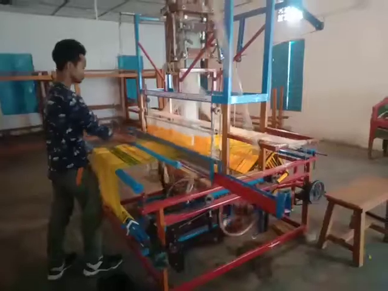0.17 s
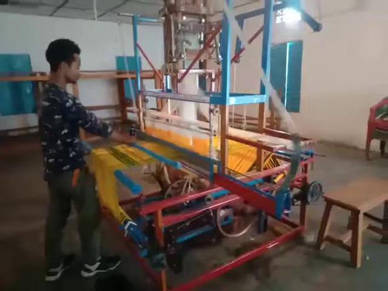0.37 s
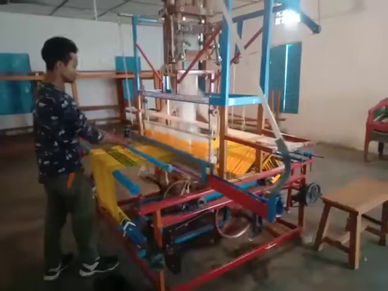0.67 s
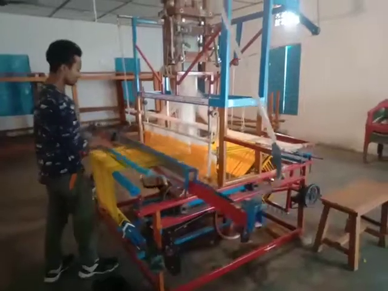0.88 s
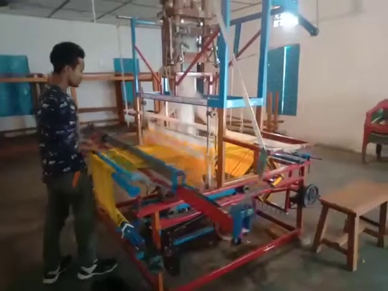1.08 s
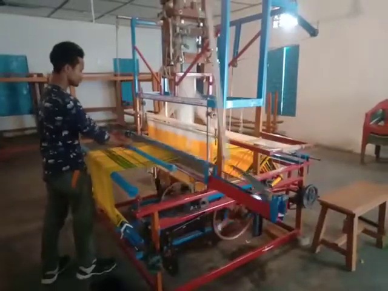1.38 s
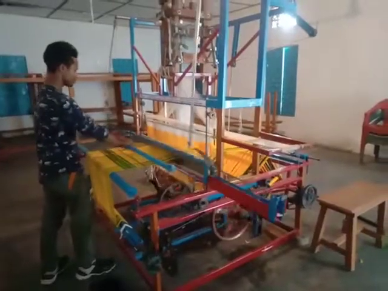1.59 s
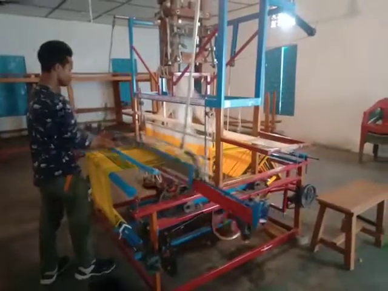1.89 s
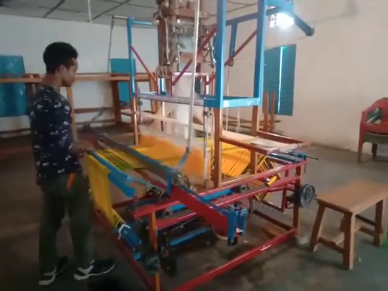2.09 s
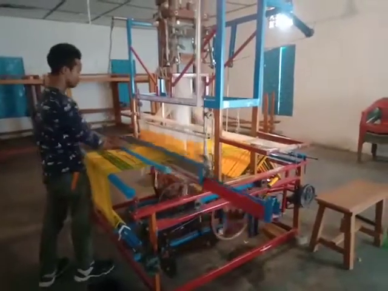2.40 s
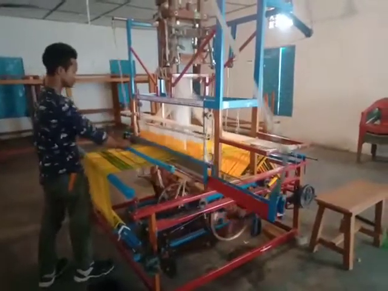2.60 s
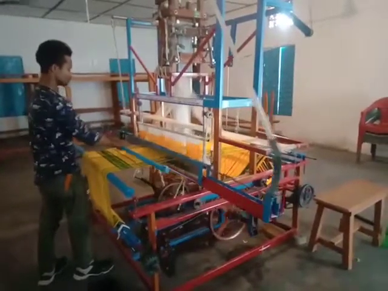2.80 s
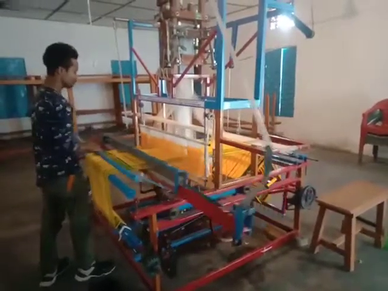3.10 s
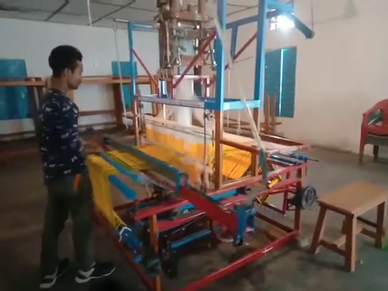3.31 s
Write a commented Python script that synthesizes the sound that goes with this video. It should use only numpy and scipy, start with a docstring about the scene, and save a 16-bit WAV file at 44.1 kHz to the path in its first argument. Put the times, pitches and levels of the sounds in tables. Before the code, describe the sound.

Continuous loom clatter with a fast motor flutter, gear roar and whine, fizzing treble bursts, dull frame knocks and faint rod clinks, in a hard, modestly echoing room, captured by a phone with little deep bass.

```python
"""A power loom runs in a bare workshop, heard by a phone whose input opens and fades in.
Roar, frame clatter, hook rattle and heddle fizz are ticks over noise, coloured per part and swelling
with the shed changes; floor rumble lies below. Gears and rubbed rods whine as noisy lines.
Harness crashes are decaying rattle bursts; batten and picker knocks and rod clinks are struck modes
with a hall tail."""
import sys
import numpy as np
from scipy import signal
from scipy.fft import rfft, irfft, next_fast_len
from scipy.io import wavfile
from scipy.ndimage import uniform_filter1d, map_coordinates

SR = 44100
rng = np.random.default_rng(int(sys.argv[2]) if len(sys.argv) > 2 else 0)


def ratio(d):
    """dB to gain"""
    e = np.asarray(d, float) / 20
    return 10 ** e


def int16_out(signal):
    """Quantize to a 16-bit WAV file."""
    q = np.round(np.clip(np.atleast_2d(signal).T, -1, 1) * 32767)
    wavfile.write(sys.argv[1], SR, q.astype(np.int16))


N = 152145

# Reverberation. Each row: frequency in Hz, t60 in seconds.
HALL_T60_S = [(200, 0.46), (2000, 0.65), (10000, 0.46)]
# Floor rumble. Each row: time in seconds, level in dB.
RUMBLE_LEVEL_DB = [(0.24, -57), (0.75, -40), (0.78, -48), (1.1, -40), (1.29, -46), (1.67, -55), (1.79, -43),
                   (1.84, -63), (1.95, -40), (2.11, -54), (2.38, -43), (2.84, -51.5), (2.89, -42),
                   (3.06, -53), (3.36, -42), (3.43, -47)]
# Spectrum of the floor rumble. Each row: frequency in Hz, density in dB per Hz.
RUMBLE_SPECTRUM_DB = [(18, -55), (30, -25), (92, -13), (119, -2), (205, -3), (241, -0.5), (380, -5),
                      (490, -14), (840, -120)]
# Steel rod modes. Each row: frequency in Hz, relative level in dB, t60 in seconds.
SHORT_ROD_MODES = [(5970, 7, .3), (6350, -4, .3), (6780, -4, .25), (8409, -11, .3), (8834, -15, .2),
                   (9485, 3, .13), (10100, -2, .25), (10420, -11, .25), (11000, -4, .14), (11990, -6, .13),
                   (12440, -6, .13), (13800, -6, .05), (14200, -16, .3)]
LONG_ROD_MODES = [(4856, 2, .35), (6121, 4, .4), (9600, -10, .15), (10550, -11, .25), (11100, -2, .1),
                  (12260, -6, .16), (13700, -8, .05)]
THIN_ROD_MODES = [(4760, 6, 0.17), (10900, 6, 0.081), (12000, -3, .25), (13400, -12, .08), (14600, -9, .08)]
# Contacts on each rod. Each row: time in seconds, relative level in dB.
SHORT_ROD_HITS = [(1.2055, -25), (1.227, -35), (1.245, -34)]
LONG_ROD_HITS = [(1.0179, -30), (2.07, -37), (2.283, -38), (3.363, -29), (3.39, -35)]
THIN_ROD_HITS = [(.7609, -38), (.81, -29.5), (2.535, -31), (2.59, -31), (3.0627, -32)]
# Frame modes under a blow. Each row: frequency in Hz, relative level in dB, t60 in seconds.
FRAME_MODES = [(1850, -8, 0.01), (2026, 3.5, 0.03), (2250, -14, 0.057), (2326, 18, 0.021),
               (2440, -2, 0.035), (2850, -5, 0.016)]
# Batten and picker knocks on the frame. Each row: time in seconds, relative level in dB.
FRAME_KNOCKS = [(0.719, -12), (0.8749, -1), (0.964, -7), (1.1438, -10), (1.1677, -4.5), (1.288, -8),
                (1.4301, -2), (1.4728, -1), (1.503, 2), (1.5423, -1), (1.5624, 2.5), (2.0722, -1.5),
                (2.114, -1.5), (2.167, 0.5), (2.3096, -4), (2.5165, -4), (2.5935, 1), (2.7343, -12),
                (3.4141, -3.5)]
# The picker's blow and its rebound. Each row: time in seconds, relative level in dB.
PICKER_BLOWS = [(1.3128, 0), (1.3212, -10)]
# Gear whines and rubbed rods. Each row: start in seconds, end in seconds, pitch in Hz, width in Hz,
# level in dB.
WHINE_SPANS = [(.1, 2.6, 130, 6.2, -60.5), (.9, 1.35, 123, 3.5, -46), (1.5, 1.9, 123, 9, -55),
               (3.24, 3.5, 125, 10, -48), (1.14, 1.25, 1760, 40, -27), (1.49, 1.6, 1490, 60, -29),
               (3.365, 3.5, 6121, 30, -31), (.29, .75, 1377, 16, -33), (.97, 1.13, 1370, 14, -35),
               (2.54, 3.0, 1377, 22, -35), (.8, 1.16, 952, 16, -39), (1.75, 2.15, 952, 26, -41),
               (2.3, 2.65, 952, 25, -41), (2.9, 3.04, 662, 30, -40), (0.322, 0.79, 2286, 30, -29),
               (1.3, 1.63, 2286, 27, -21.5), (2.07, 2.45, 2000, 56, -21.5), (1.3, 1.56, 3000, 96, -26.5),
               (.77, 1.02, 4800, 300, -29), (1.02, 1.22, 4791, 32, -30), (1.45, 1.64, 4900, 450, -26),
               (2.507, 2.78, 4950, 700, -25), (3.016, 3.33, 4850, 350, -26), (1.09, 1.18, 10520, 50, -42),
               (1.31, 1.414, 6120, 61, -26)]
# Harness crashes. Each row: start in seconds, relative level in dB, t60 in seconds,
# hooks against heddles in dB.
HARNESS_CRASHES = [(.202, -28.5, 0.31, 5), (.556, -33.5, 0.17, 14), (.761, -38, 0.18, -7),
                   (.835, -24.5, 0.1, 10.5), (1.018, -26, 0.064, -3), (1.172, -25, 0.047, 0),
                   (1.206, -24, 0.084, -1), (1.313, -21, 0.061, 3), (1.415, -32, 0.3, 6),
                   (1.544, -12, 0.066, 0), (2.07, -24, .1, -8), (2.242, -31, 0.077, 9),
                   (2.44, -26, 0.16, 7), (2.506, -19, 0.2, -4), (2.59, -20.5, 0.16, 0),
                   (2.632, -24.5, 0.15, 10), (1.995, -27.5, 0.15, 1), (1.835, -27, 0.075, 12),
                   (.335, -31, 0.31, 0), (2.906, -27.5, 0.14, -3), (3.016, -31, 0.09, 17),
                   (3.062, -19, 0.046, 5), (3.31, -35, .08, -7), (3.363, -24.5, .08, 9)]
# Part levels. Each row: time in seconds, drive roar in dB, then frame clatter, hook rattle and
# heddle fizz in dB before trim.
PART_LEVELS_DB = [(0.24, -35, -22, -22.5, -30.5), (0.35, -31.5, -16, -18, -29.5),
                  (0.43, -32, -17.5, -20, -36.5), (0.75, -27.5, -17.5, -22, -41),
                  (0.76, -34, -18, -19.5, -31), (0.95, -29, -20.5, -20.5, -36.5),
                  (1.19, -27.5, -19, -24, -40.5), (1.22, -32, -18, -21, -35), (1.27, -24, -18, -19.5, -41),
                  (1.31, -42, -15.5, -31.5, -37), (1.32, -30, -15.5, -24, -35.5),
                  (1.39, -32.5, -19, -25, -36), (1.42, -33.5, -15, -18.5, -27.5),
                  (1.53, -26, -11.5, -16.5, -31), (1.55, -28, -12.5, -15.5, -21.5),
                  (1.63, -31.5, -15.5, -19.5, -32), (2.04, -29.5, -17.5, -18.5, -38.5),
                  (2.1, -31.5, -15.5, -24, -33), (2.15, -30.5, -19.5, -25, -38.5),
                  (2.35, -27.5, -14.5, -25.5, -38.5), (2.5, -31, -17, -19.5, -32),
                  (2.515, -28.5, -14, -13, -24.5), (2.82, -32, -18.5, -20, -37.5),
                  (2.9, -28.5, -16, -18.5, -36), (3.01, -29.5, -18, -23.5, -37),
                  (3.02, -34.5, -19, -19, -26.5), (3.26, -28, -19, -19.5, -34.5),
                  (3.43, -31, -17, -24, -38.5)]
# Spectra of the parts. Each row: frequency in Hz, relative level in dB.
ROAR_SPECTRUM_DB = [(190, -50), (330, -14.5), (521, -11.5), (671, -7.5), (757, -9.5), (939, -4), (1230, -3),
                    (1500, -1.5), (1950, -53), (3300, -120)]
FRAME_SPECTRUM_DB = [(760, -37), (1300, -26.5), (1370, -34), (1570, -11), (2240, 1.5), (2330, -1),
                     (2690, -7.5), (3300, -13), (4300, -24), (5590, -80), (9460, -120)]
HOOK_SPECTRUM_DB = [(2240, -31), (3800, -5), (4310, -6), (4680, 0), (4890, 0), (6150, -4.5), (7100, -10.5),
                    (7900, -22), (8600, -21.5), (11200, -24.5), (18900, -120)]
HEDDLE_SPECTRUM_DB = [(4590, -10.5), (7800, -0.5), (9040, -10.5), (9740, 1.5), (10800, 3), (11400, -1),
                      (12300, 1), (12600, -3), (14800, -7.5), (15600, -19)]
# Phone input fade. Each row: time in seconds, gain in dB.
INPUT_GAIN_DB = [(.1145, -24), (.128, -16), (.15, -10.5), (.198, -9), (.216, 0), (.26, 0)]

HALL_DB = -3
SHAFT_HZ = 20.6  # mean motor shaft turns a second
WHINE_RISE_S, WHINE_FALL_S = .008, .06
INPUT_OPENS_S, LOW_CUT_HZ = .1145, 86
CLIP_CEILING, CLIP_KNEE = 1.03, 5  # amplitude; exponent, higher = harder


def unit(x):
    """Scaled to rms 1."""
    return x / np.sqrt(np.mean(x ** 2) + 1e-20)


def along(points, hz):
    """(Hz, value) points interpolated on a log frequency axis."""
    f, v = np.transpose(points)
    return np.interp(np.log(hz + 1), np.log(f + 1), v)


def curves(rows):
    """One value per sample for each column after the time."""
    s, *cols = np.transpose(rows)
    return [np.interp(np.arange(N) / SR, s, c) for c in cols]


def wobble(knots_per_s):
    """A smooth random curve through normal knots."""
    knots = rng.standard_normal(N // 200)
    return map_coordinates(knots, [np.arange(N) * knots_per_s / SR])


def filtered(x, response):
    """x times a zero-phase response of frequency in Hz."""
    m = next_fast_len(N + SR // 2)
    return irfft(rfft(x, m) * response(np.fft.rfftfreq(m, 1 / SR)), m)[..., :N]


def clatter(spectrum, ticks_per_s, spread_db, ticks_db, patchy_db, ring_db):
    """Random ticks over a noise wash, with patches and narrow ringing peaks, coloured by the part; rms 1."""
    chance, sign, size = rng.random((3, N))
    ticks = (chance < ticks_per_s / SR) * np.sign(sign - .5)
    ticks = ticks * ratio(-spread_db * np.log(size + .002))
    wash = rng.standard_normal(N)
    z = signal.stft(ratio(ticks_db) * unit(ticks) + wash, nperseg=1024)[2]
    patches = uniform_filter1d(rng.standard_normal(z.shape), size=10, axis=0)
    patches = uniform_filter1d(patches, size=5, axis=1)
    # smoothed in time only: one bin wide
    rings = uniform_filter1d(rng.standard_normal(z.shape), size=14, axis=1)
    z = z * ratio(patchy_db * unit(patches) + ring_db * unit(rings))
    x = signal.istft(z, nperseg=1024)[1][:N]
    return unit(filtered(x, lambda hz: ratio(along(spectrum, hz))))


def struck(times_s, levels_db, modes, attack_s, scatter_db, flutter_hz, rough):
    """Each blow rings the modes anew; loose contact soon makes each mode flutter."""
    hz, db, t60_s = np.transpose(modes)[:, :, None]
    out = np.zeros(N + SR)
    t = np.arange(round(min(t60_s.max(), .5) * SR)) / SR
    onset = 1 - np.exp(-t / attack_s)
    flutter_onset = 1 - np.exp(-t * flutter_hz)

    def flutter(knots):
        rows = [map_coordinates(k, [t * flutter_hz], order=1) for k in knots]
        return np.array(rows) * flutter_onset

    for s, level_db in zip(times_s, levels_db):
        level_draw, pitch_draw = rng.standard_normal((2, len(modes), 1))
        in_phase, quadrature = [flutter(k) for k in rng.standard_normal((2, len(modes), 200))]
        phase = 2 * np.pi * hz * (1 + 0.0021 * pitch_draw) * t
        decay = ratio(db + scatter_db * level_draw - 60 * t / t60_s)
        ring = decay * ((1 + rough * in_phase) * np.sin(phase) + rough * quadrature * np.cos(phase))
        out[round(s * SR):][:len(t)] += ratio(level_db) * ring.sum(0) * onset
    return out[:N]


def hall(x):
    """A delayed noise tail of unit energy in which each frequency dies at its own speed."""
    hz, t, z = signal.stft(rng.standard_normal(SR), SR, nperseg=256)
    decay = ratio(-60 * t / along(HALL_T60_S, hz)[:, None])
    tail = signal.istft(z * decay, SR, nperseg=256)[1]
    delayed = np.pad(x, (300, 0))  # samples
    return signal.fftconvolve(delayed, tail / np.linalg.norm(tail))[:N]


def floor_rumble():
    """Low noise with sparse ticks, its level drifting."""
    level_db = curves(RUMBLE_LEVEL_DB)[0] + 1.4 * wobble(8.6)
    return ratio(level_db) * clatter(RUMBLE_SPECTRUM_DB, 100, 1.6, ticks_db=-4.5, patchy_db=1.5, ring_db=1.2)


def clinks():
    """Contacts ring three steel rods, each with its own modes."""
    rods = [(SHORT_ROD_HITS, SHORT_ROD_MODES), (LONG_ROD_HITS, LONG_ROD_MODES),
            (THIN_ROD_HITS, THIN_ROD_MODES)]
    loose = dict(attack_s=.0008, scatter_db=1.5, flutter_hz=90, rough=.45)
    return sum(struck(*np.transpose(hits), modes, **loose) for hits, modes in rods)


def knocks():
    """Dull batten and picker blows ring the frame's short modes."""
    s, db = np.transpose(FRAME_KNOCKS)
    dull = struck(s, db - 16.5, FRAME_MODES, attack_s=0.0023, scatter_db=3.5, flutter_hz=151, rough=0.5)
    s, db = np.transpose(PICKER_BLOWS)
    picker = struck(s, db - 12, FRAME_MODES, attack_s=0.00082, scatter_db=1, flutter_hz=150, rough=0.1)
    return dull + picker


def crashes():
    """Sudden bursts of hook and heddle rattle that die away exponentially."""
    t = np.arange(N) / SR
    heddle_level, hook_level = np.zeros(N), np.zeros(N)
    for s, db, t60_s, hooks_db in HARNESS_CRASHES:
        u = np.clip(t - s, 0, None)
        shape = ratio(db - 60 * u / t60_s) * (1 - np.exp(-u / .0025))
        heddle_level += shape
        hook_level += ratio(hooks_db) * shape
    heddles = clatter(HEDDLE_SPECTRUM_DB, 1500, 2, ticks_db=-3, patchy_db=2.5, ring_db=1.5)
    hooks = clatter(HOOK_SPECTRUM_DB, 1500, 2, ticks_db=-5, patchy_db=2, ring_db=1.5)
    return heddle_level * heddles + hook_level * hooks


def whine():
    """Gears whine and rubbed rods ring under load: noise lines over tones, purer the narrower the line."""
    t, out = np.arange(N) / SR, np.zeros(N)
    for start_s, end_s, pitch_hz, width_hz, db in WHINE_SPANS:
        skirt = unit(filtered(rng.standard_normal(N),
                              lambda f: 1 / (1 + ((f - pitch_hz) / width_hz * 2) ** 2)))
        tone = 22 / width_hz * np.sin(2 * np.pi * pitch_hz * t)
        fade = np.clip(np.minimum((t - start_s) / WHINE_RISE_S, (end_s - t) / WHINE_FALL_S), 0, 1)
        out += ratio(db) * fade * unit(skirt + tone)
    return out


def shaft_shake():
    """Each slightly uneven motor shaft turn jolts the parts; dB, before each part's share."""
    turn = (SHAFT_HZ * np.arange(N) / SR + 0.027 * wobble(1.4)) % 1
    return 1.6 * np.exp(-turn / 0.17) + 0.16 * wobble(25.2)


def drive_roar(level_db, shake_db):
    """Drive gears roar: widely spread ticks deep in noise."""
    level_db = level_db + 0.42 * shake_db + 0.42 * wobble(6.57)
    return ratio(level_db) * clatter(ROAR_SPECTRUM_DB, 300, 3.1, ticks_db=-12, patchy_db=1.5, ring_db=1.5)


def frame_clatter(level_db, shake_db):
    """The frame clatters: dense ticks in the mid band, shaken most by the shaft."""
    level_db = level_db - 0.38 + 1.4 * shake_db + 0.45 * wobble(54)
    return ratio(level_db) * clatter(FRAME_SPECTRUM_DB, 900, 2, ticks_db=-4, patchy_db=.8, ring_db=1.9)


def hook_rattle(level_db, shake_db):
    """Steel hooks rattle: dense ticks in the treble."""
    level_db = level_db - 0.97 + 0.58 * shake_db + 0.37 * wobble(60)
    return ratio(level_db) * clatter(HOOK_SPECTRUM_DB, 900, 2, ticks_db=-5, patchy_db=1.5, ring_db=1.8)


def heddle_fizz(level_db, shake_db):
    """Heddles fizz: dense ticks in the top treble."""
    level_db = level_db - 1.35 + 0.92 * shake_db + 1.1 * wobble(40)
    return ratio(level_db) * clatter(HEDDLE_SPECTRUM_DB, 900, 2, ticks_db=-5, patchy_db=2, ring_db=2)


def loom():
    """Four running parts share the shaft's shake, each with its own grain and flutter."""
    roar_db, frame_db, hooks_db, heddles_db = curves(PART_LEVELS_DB)
    shake_db = shaft_shake()
    return (drive_roar(roar_db, shake_db) + frame_clatter(frame_db, shake_db)
            + hook_rattle(hooks_db, shake_db) + heddle_fizz(heddles_db, shake_db))


def scene():
    """Clinks and knocks get a hall tail; rumble, whine, running parts and crashes stay dry."""
    blows = clinks() + knocks()
    dry_parts = floor_rumble() + whine() + crashes() + loom()
    return (dry_parts + blows + ratio(HALL_DB) * hall(blows))[None]


def roll_off(x):
    """The treble ends steeply here."""
    return signal.sosfilt(signal.butter(12, 15710, fs=SR, output="sos"), x)


def record(dry):
    """The phone input fades in, peaks clip softly, the bass is cut, and all is silent until the input opens."""
    gain_db, = curves(INPUT_GAIN_DB)
    x = dry * ratio(gain_db)
    x = x / (1 + np.abs(x / CLIP_CEILING) ** CLIP_KNEE) ** (1 / CLIP_KNEE)
    x = filtered(x, lambda hz: 1 / (1 + (LOW_CUT_HZ / (hz + 1)) ** 2))
    is_open = np.arange(N) >= INPUT_OPENS_S * SR
    return roll_off(x * is_open)


dry = scene()
out = record(dry)
int16_out(out)
```